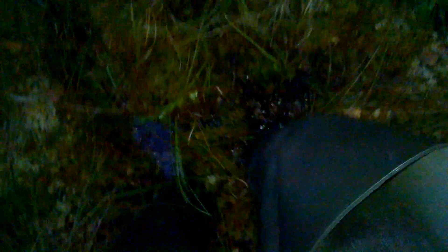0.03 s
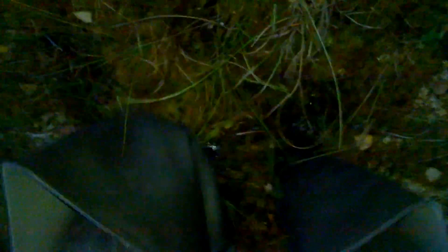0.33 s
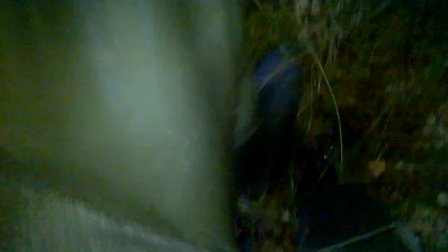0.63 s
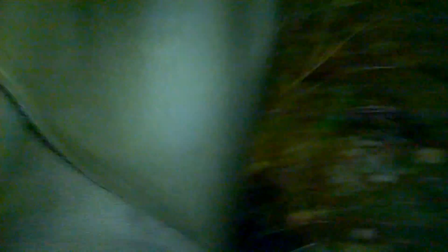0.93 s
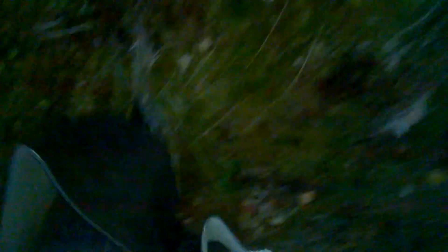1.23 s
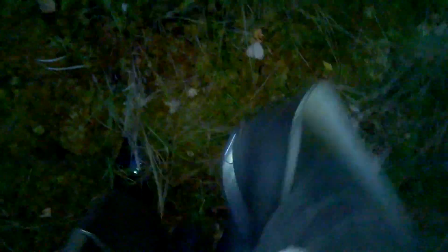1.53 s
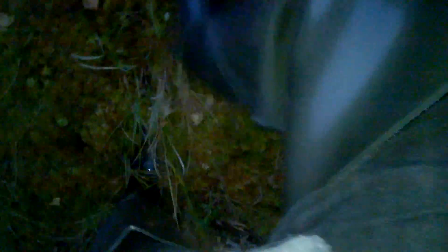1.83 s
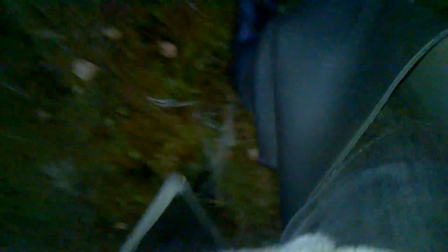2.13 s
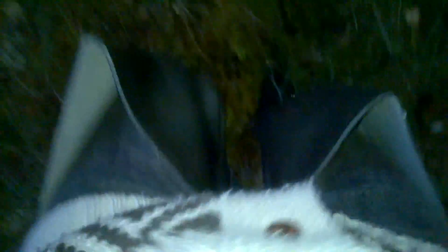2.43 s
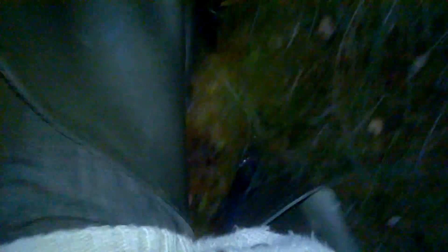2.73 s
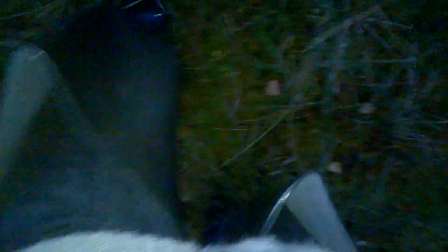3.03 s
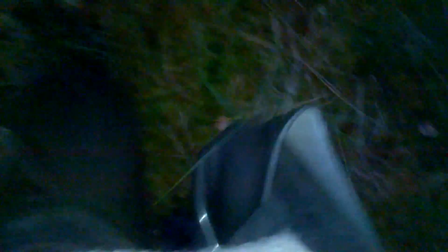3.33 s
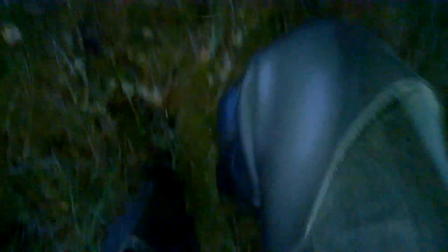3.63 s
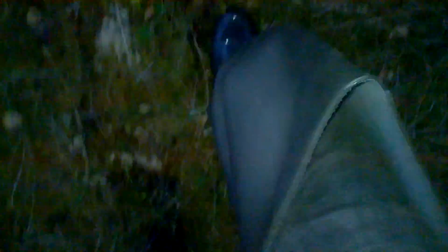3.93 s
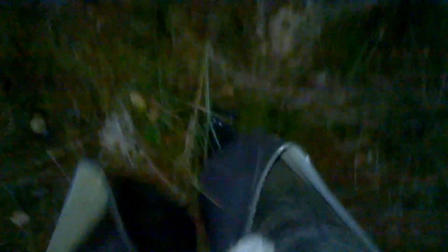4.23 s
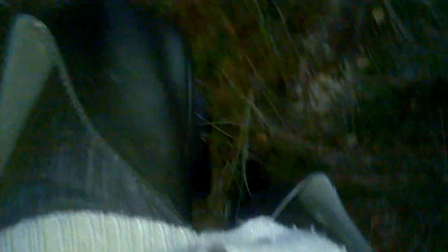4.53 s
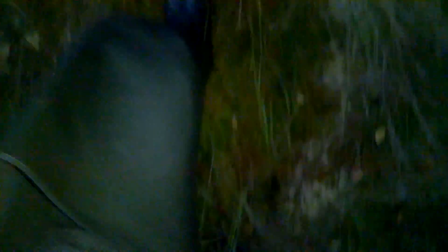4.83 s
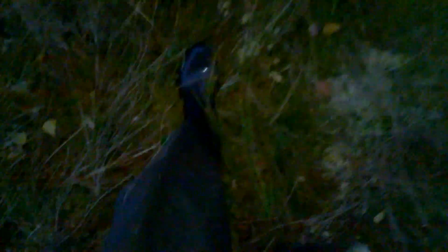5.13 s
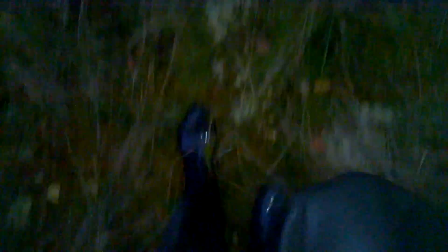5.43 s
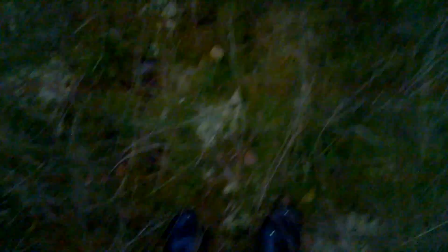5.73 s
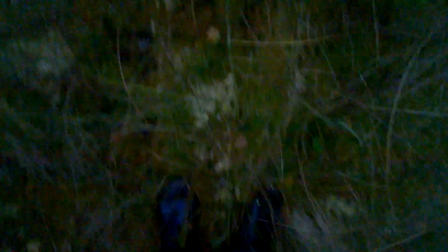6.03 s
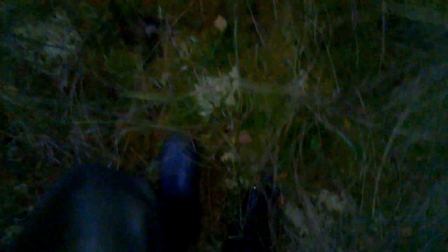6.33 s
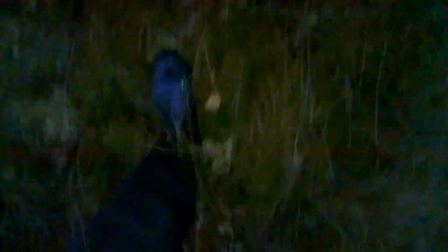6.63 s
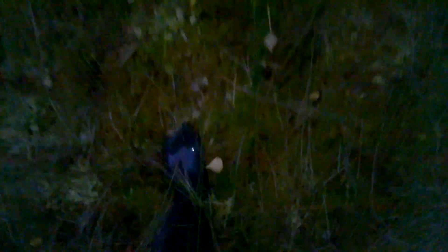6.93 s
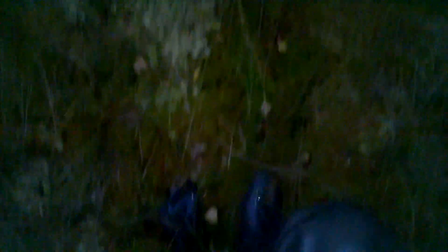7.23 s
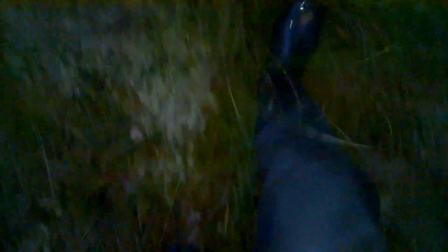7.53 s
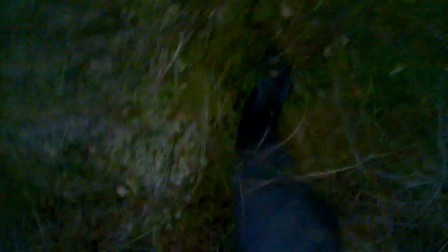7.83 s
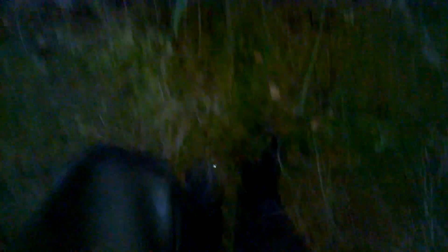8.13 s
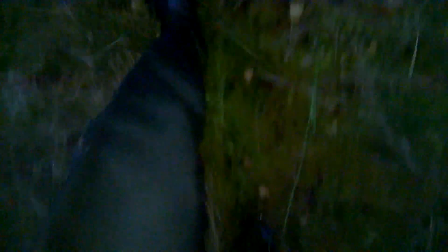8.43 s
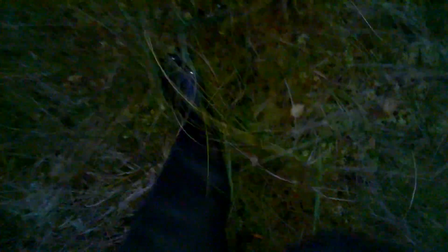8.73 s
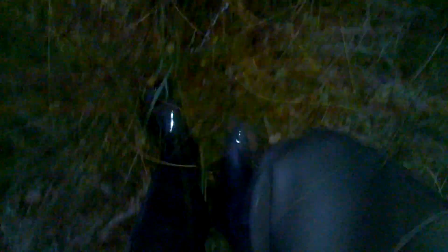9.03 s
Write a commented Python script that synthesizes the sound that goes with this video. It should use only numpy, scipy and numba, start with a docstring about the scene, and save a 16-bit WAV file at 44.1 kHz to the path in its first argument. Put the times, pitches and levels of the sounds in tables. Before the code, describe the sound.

Close footsteps in rubber waders on soaked moss and grass, with hollow rubber knocks and a low rumble of air.

```python
"""On wet moss and grass, someone walks in rubber waders, heard from about hip height.
On each stride a boot lifts through the grass, the legs rub past each other and a boot shaft (the
tube around the leg) folds with a falling, hollow scuff. Loose rubber knocks close to the microphone.
Underfoot, soaked moss fizzes, stalks crackle and the soft ground thuds.
Air rumbles on the carried microphone, over a faint outdoor hush."""
import sys
import numpy as np
from scipy import signal
from scipy.fft import rfft, irfft, next_fast_len
from scipy.io import wavfile
from numba import njit

SR = 44100
rng = np.random.default_rng(int(sys.argv[2]) if len(sys.argv) > 2 else 0)


def inscribe(sig):
    """Save sig as 16-bit PCM at rate SR to the path in sys.argv[1].

    A 1-D sig is mono; a 2-D sig holds one channel per row.
    Samples are clipped to [-1, 1] before scaling.
    """
    pcm = np.round(np.clip(np.atleast_2d(sig).T, -1, 1) * 32767)
    wavfile.write(sys.argv[1], SR, pcm.astype(np.int16))


N = 401310

# one leg swings past the other, at full speed from time t:
# t/s, rise/s, hold/s, fall/s, rubbing/dB, squelch/dB, stalks/dB, hiss/dB
LEG_SWINGS = [(0.94, 0.04, 0.11, 0.15, -42, -46.5, -46.5, -57.5),
              (1.835, 0.027, 0.1, 0.26, -46.5, -50, -51.5, -66),
              (2.89, 0.13, 0.12, 0.18, -46, -45.5, -55, -66),
              (3.97, 0.077, 0.065, 0.091, -43.5, -42.5, -46.5, -60.5),
              (4.841, 0.028, 0.13, 0.13, -44, -45.5, -47, -56),
              (5.509, 0.025, 0.085, 0.19, -46, -44, -49.5, -59),
              (6.609, 0.075, 0.17, 0.15, -44, -50.5, -56, -64),
              (7.505, 0.036, 0.11, 0.18, -43.5, -47.5, -47, -56),
              (8.432, 0.12, 0.15, 0.04, -41.5, -47, -46, -59)]
# between strides the legs never quite rest: t/s, rubbing/dB, squelch/dB, stalks/dB
RESTING_LEVELS = [(0, -69, -62.5, -65.5), (1.4, -75, -58.5, -64), (5, -63.5, -61.5, -63),
                  (9.1, -55, -72.5, -80)]
# a boot shaft folds: t/s, rise/s, fall/s, level/dB, starting f/Hz, rasp against that level/dB
SHAFT_FOLDS = [(.11, 0.038, 0.078, -57.5, 420, -3), (0.303, .01, 0.035, -31, 1340, 1),
               (0.333, 0.017, 0.048, -41, 390, 2.5), (.364, 0.0043, 0.016, -41.5, 1150, 1),
               (0.504, 0.017, 0.0083, -52.5, 1070, 8), (0.908, .005, .03, -44, 1700, 0),
               (.963, 0.019, 0.014, -32.5, 1300, -8.5), (1.271, 0.018, .017, -35, 795, -3.5),
               (1.299, 0.019, 0.033, -35, 805, -14.5), (2.041, 0.053, 0.031, -38.5, 1360, -20),
               (2.087, 0.015, 0.073, -38, 740, -20), (2.28, 0.027, 0.043, -52, 476, -10),
               (2.98, 0.02, 0.02, -51, 1360, 4), (2.995, 0.0057, 0.088, -44.5, 645, -20),
               (3.198, 0.043, 0.023, -40, 1490, -20), (4.006, 0.056, 0.02, -39, 1420, -12),
               (4.042, .025, 0.014, -33.5, 850, -24), (4.08, 0.039, 0.02, -45, 800, -5),
               (4.46, 0.043, 0.07, -54, 1450, -23), (4.872, 0.023, 0.027, -41, 1290, -15),
               (4.939, 0.023, 0.041, -42.5, 654, -23), (5.491, 0.0053, 0.027, -47, 1310, 8),
               (6.048, 0.0027, 0.0092, -38, 1420, 5), (6.06, 0.035, 0.0096, -30.5, 1450, 4),
               (6.096, 0.016, 0.031, -39, 1230, 3), (6.72, 0.06, 0.041, -51.5, 1500, 7.5),
               (7.49, 0.023, .02, -48.5, 1500, 8.5), (8.479, .012, 0.011, -38.5, 1400, 4),
               (8.5, 0.088, 0.024, -37.5, 1100, -12), (8.586, 0.0048, 0.012, -30.5, 1240, -3.5)]
# loose rubber knocks: t/s, ring level/dB, ring f/Hz, crack level/dB, thump level/dB
RUBBER_KNOCKS = [(0.415, -30.5, 590, -65, -23.5), (.724, -36, 700, -55, -28), (0.999, -26, 776, -60, -21),
                 (1.321, -25, 645, -64, -21), (2.709, -54, 600, -86, -30), (3.1658, -21, 1120, -35, -38),
                 (3.2032, -24, 1300, -30.5, -50), (3.2134, -4.5, 1140, -20.5, -23),
                 (3.797, -21.5, 1110, -60, -22), (3.9449, -23, 1240, -25.5, -55),
                 (4.4517, -11.5, 1200, -51, -50), (5.581, -16, 1210, -28, -26),
                 (5.5925, -8.5, 1000, -22, -12.5), (5.597, -8.5, 870, -36, -10),
                 (5.6108, -1, 1130, -17.5, -9.5), (5.7278, -17, 1080, -59, -29),
                 (5.941, -18, 1010, -37, -28), (5.954, -20, 930, -36, -47), (5.9602, -11.5, 1010, -24, -39),
                 (5.9616, -1.5, 935, -28, -15.5), (6.311, -25, 1060, -51, -16.5),
                 (6.827, -26, 910, -63, -25), (6.9036, -0.5, 997, -19.5, -9),
                 (7.208, -27, 1170, -33.5, -41), (7.2104, -10.5, 1010, -33, -16),
                 (7.9805, -23.5, 1060, -35, -19), (7.9865, -30, 980, -34, -57), (8.5691, -3, 770, -13, -7),
                 (8.5738, -9.5, 1160, -16.5, -24)]
# tones of a knocked shaft: multiple of the ring pitch, level/dB, t60/s (time to fade by 60 dB)
SHAFT_TONES = [(.76, -18.5, 0.014), (1.0, 2.5, 0.0062), (1.38, 4, 0.00091), (2.0, -9, 0.0072),
               (3.6, -26, 0.001)]
# tones in the crack of a rubber edge letting go: f/Hz, level/dB, t60/s
CRACK_TONES = [(1860, -1, 0.0042), (3800, 4, 0.0023), (11030, 4, 0.0017), (14600, -6, 0.0031)]
# a boot lifts or shifts in the grass: t/s, length/s, hiss/dB, low f/Hz, high f/Hz, stalks/dB, squelch/dB
GRASS_BRUSHES = [(0.401, 0.25, -57, 5000, 13300, -52.5, -54), (0.588, 0.33, -54, 10000, 16000, -51, -61),
                 (1.595, 0.3, -59.5, 8800, 16300, -57.5, -62), (2.217, 0.27, -82, 6000, 12000, -57, -55.5),
                 (2.556, 0.39, -58, 8100, 14300, -52.5, -62), (3.077, .28, -67, 9050, 16000, -71, -49),
                 (3.65, 0.15, -59, 8000, 15300, -56.5, -76), (4.12, 0.32, -77, 6000, 12000, -55.5, -52),
                 (4.431, 0.1, -57.5, 5000, 14000, -53.5, -70), (4.544, 0.29, -59, 8500, 13600, -55.5, -71),
                 (5.173, 0.3, -61.5, 6060, 13000, -56, -59), (5.423, 0.14, -52.5, 5800, 15000, -48.5, -71),
                 (6.169, 0.049, -55.5, 5300, 11300, -65, -58), (6.318, 0.29, -54.5, 5100, 14300, -62, -68),
                 (6.954, 0.43, -62, 5840, 10400, -79, -74), (7.289, 0.21, -55.5, 6250, 14100, -56, -63),
                 (8.049, 0.2, -50.5, 5000, 15000, -60, -56.5), (8.227, 0.26, -50.5, 5460, 13200, -63, -75),
                 (8.61, 0.41, -63, 5800, 9700, -67.5, -67), (8.926, 0.22, -55.5, 5840, 12600, -62, -83)]
# the loudest stalks snapping and bubbles bursting: t/s, level/dB, f/Hz
LOUD_SNAPS = [(0.039, -43, 3000), (.428, -37, 1600), (0.527, -30.5, 3070), (0.95, -22, 2580),
              (1.279, -25.5, 2930), (1.913, -29, 2130), (1.951, -30, 2370), (2.626, -31, 3480),
              (2.995, -24.5, 2800), (3.001, -25, 3150), (4.841, -32, 2630), (4.877, -35, 1290),
              (5.183, -36.5, 3070), (5.493, -48, 2400), (6.759, -31.5, 5630), (7.455, -36.5, 2180),
              (7.524, -28, 4100)]
# boots sink into the moss: t/s, level/dB, f/Hz
GROUND_THUDS = [(0.725, -40, 91), (2.165, -34.5, 81), (3.222, -25, 45), (5.615, -49, 45),
                (5.735, -23.5, 65), (6.098, -27, 85), (6.967, -30, 59), (8.637, -29, 109),
                (8.791, -27.5, 42)]
# slow rise and fall of the air rumble, before boost and gusts: t/s, level/dB
RUMBLE_LEVELS = [(0.0, -53), (0.68, -53.5), (0.73, -42.5), (1.52, -51), (3.27, -43), (3.47, -53.5),
                 (5.04, -51.5), (5.45, -52), (5.75, -43), (5.78, -50.5), (6.72, -54.5), (6.77, -46),
                 (8.46, -47), (8.56, -37), (8.77, -55), (8.79, -43.5), (9.1, -58)]

# A colour says how strong the low and high parts of a sound are next to each other.
# rubber sliding on rubber: f/Hz, level/dB
RUB_COLOUR = [(100, 2), (230, 5.5), (340, 3), (500, 5), (850, 5.5), (1250, 2.5), (1800, 4), (2600, 8),
              (5000, -39.5)]
# the rasp of a folding shaft: f/Hz, level/dB
RASP_COLOUR = [(150, -7.5), (550, -15.5), (1300, -11), (1650, -11.5), (2150, -2), (3000, -6), (4200, -19),
               (7000, -22.5), (15000, -37)]
# water fizzing out of moss: f/Hz, level/dB
FIZZ_COLOUR = [(1000, -17), (1700, 2.5), (2250, 7.5), (3100, 9), (3900, -3.5), (5500, -72)]
# grass flicking along the boots: f/Hz, level/dB
STALK_COLOUR = [(2800, 3.5), (3900, 5), (5200, 3.5), (6000, -2.5), (7000, -7), (12000, -34)]
# air pushing on the microphone: f/Hz, level/dB
RUMBLE_COLOUR = [(20, -2.5), (34, 4.5), (50, -20), (100, -21.5), (180, -26), (400, -30), (900, -100)]
# the outdoor hush: f/Hz, level/dB
HUSH_COLOUR = [(35, -26), (60, 5), (448, -9), (803, -6), (1510, -24), (2300, -14.5), (3190, -53),
               (4120, -29.5), (5860, -21.5), (7750, -28), (12100, -29.5), (14900, -34), (16000, -39)]


def rubbing(rub_db, judder_db=3.5, hollow_db=-6, hollow_hz=1150, wander_octaves=0.31, damping=0.24):
    """Rubber slides on rubber in tiny slips, gripping unevenly; its creases ring at a wandering pitch."""
    sliding = coloured(slips(4000, spread_db=2.0), RUB_COLOUR)
    crease_hz = hollow_hz * 2 ** (wander_octaves * drift(30))
    creases = rms_one(gliding_resonance(sliding, crease_hz, damping, SR))
    return from_db(rub_db + judder_db * drift(70)) * rms_one(sliding + from_db(hollow_db) * creases)


def scuffs(damping=0.75, judder_db=3.5, body_db=-12.5, dull_hz=3500, end_pitch_ratio=0.6):
    """A folding shaft rasps, and its hollow note sinks as the fold opens."""
    out = np.zeros(N)
    friction = butter(slips(2500, spread_db=-3.0), dull_hz, "low")
    rasp = coloured(slips(3500, spread_db=2.5), RASP_COLOUR)
    grip = from_db(judder_db * drift(200))
    body = from_db(body_db) * rms_one(butter(slips(2500, spread_db=1.5), [170, 400], "band"))
    for s, rise, fall, db, first_hz, rasp_db in SHAFT_FOLDS:
        t = np.arange(int((rise + 2 * fall) * SR)) / SR
        part = slice(int(s * SR), int(s * SR) + len(t))
        pressure = np.where(t < rise, (t / rise) ** 0.36, np.exp(-1.5 * ((t - rise) / fall) ** 2))
        hz = np.interp(t, [0, rise + fall], [first_hz, end_pitch_ratio * first_hz])
        hollow = gliding_resonance(friction[part], hz, damping, SR)
        hollow = rms_one(gliding_resonance(hollow, hz, damping, SR))   # twice, for a clearer note
        # wide, low folds shake the whole shaft
        shake = body[part] * np.minimum(800 / hz, 1) ** 2
        add(out, s, from_db(db) * pressure * (hollow + from_db(rasp_db) * rasp[part] + shake))
    return out * grip


def knocks(thump_hz=120, thump_t60=0.01, tail_db=-38, tail_s=0.019, rebound_db=-15, rebound_s=0.002376):
    """Loose rubber snaps over: a very short crack, a dull ring, a weak rebound and a low thump."""
    out, t = np.zeros(N), np.arange(SR // 6) / SR
    click = signal.unit_impulse(len(t))
    thump = butter(ring(click, thump_hz, thump_t60), 430, "low")
    for s, db, hz, crack_db, thump_db in RUBBER_KNOCKS:
        # neighbouring tones swing opposite ways, so the ring swells over its first cycle
        shaft = sum((-1) ** k * from_db(tone_db) * ring(click, ratio * hz, t60)
                    for k, (ratio, tone_db, t60) in enumerate(SHAFT_TONES))
        # each snap frees a slightly different length of edge
        crack = sum((-1) ** k * from_db(tone_db) * ring(click, tone_hz * rng.uniform(.92, 1.08), t60)
                    for k, (tone_hz, tone_db, t60) in enumerate(CRACK_TONES))
        shiver = rms_one(butter(rng.standard_normal(len(t)), [700, 1700], "band"))
        # a small patch of rubber gives off little sound below its ring
        body = butter(shaft, hz / 2, "high") + from_db(tail_db) * shiver * np.exp(-t / tail_s)
        add(out, s, from_db(crack_db) * crack + from_db(db) * body - from_db(thump_db) * thump)
        add(out, s + rebound_s * rng.uniform(.8, 1.2), from_db(db + rebound_db) * body)
    return out


def brushes(swing_db, tick_db=-4, flutter_db=4.0, swing_band_hz=(7500, 13500)):
    """Fibres hiss and single blades catch whenever a leg swings or a boot brushes the grass."""
    blades = from_db(tick_db) * slips(450, spread_db=5.0)
    fibres = (rng.standard_normal(N) + blades) * from_db(flutter_db * drift(45))
    out = from_db(swing_db) * rms_one(butter(fibres, swing_band_hz, "band"))
    for s, length, db, low_hz, high_hz, *_ in GRASS_BRUSHES:
        stroke = fibres[int(s * SR):][:int(length * SR)]
        for _ in range(2):
            stroke = butter(stroke, [low_hz, high_hz], "band")
        add(out, s, from_db(db) * swell(length)[:len(stroke)] * rms_one(stroke))
    return out


def squelch(squelch_db, flutter_db=3.0, pop_db=-11):
    """Water fizzes out of the squeezed moss and small bubbles burst in it."""
    fizz = coloured(slips(9000, spread_db=5.5), FIZZ_COLOUR) * from_db(flutter_db * drift(60))
    pitches_hz = np.geomspace(2000, 4400, num=16)
    bursts = slips(220, spread_db=6.5)
    pitch_choice = rng.integers(0, len(pitches_hz), N)
    pops = rms_one(sum(ring(bursts * (pitch_choice == k), hz, 30 / hz) for k, hz in enumerate(pitches_hz)))
    return from_db(squelch_db) * (fizz + from_db(pop_db) * pops)


def stalks(swish_db, flutter_db=3.0):
    """Grass blades flick along the boots in little clumps."""
    return from_db(swish_db + flutter_db * drift(50)) * coloured(slips(5000, spread_db=3.5), STALK_COLOUR)


def crackle(squelch_db, per_s=55, relative_db=-11, band_hz=(1400, 3400)):
    """Small stems give way now and then under the weight."""
    breaks = butter(slips(per_s, spread_db=2.0), band_hz, "band")
    return from_db(squelch_db + relative_db) * rms_one(breaks)


def snaps(cycles=24, splinter_db=-3, splinter_s=0.0025):
    """A stalk snaps or a bubble bursts: a splinter of noise and a short, pitched tick."""
    out, t = np.zeros(N), np.arange(SR // 20) / SR
    for s, db, hz in LOUD_SNAPS:
        noise = rms_one(butter(rng.standard_normal(len(t)), [hz / 2, hz * 1.19], "band"))
        splinter = noise * np.exp(-t / splinter_s)
        tick = ring(signal.unit_impulse(len(t)), hz, cycles / hz)
        add(out, s, from_db(db) * (tick + from_db(splinter_db) * splinter))
    return out


def thuds(t60=0.055):
    """The soft ground takes the weight with a short, deep swing."""
    out, click = np.zeros(N), signal.unit_impulse(SR // 4)
    for s, db, hz in GROUND_THUDS:
        add(out, s, from_db(db) * ring(click, hz, t60))
    return butter(out, 260, "low")


def air_rumble(boost_db=0.3, gust_db=2.0):
    """Air pushes on the carried microphone in uneven, deep gusts."""
    slow_db, = in_time(RUMBLE_LEVELS)
    gain = from_db(slow_db + boost_db + gust_db * drift(14))
    return gain * coloured(rng.standard_normal(N), RUMBLE_COLOUR)


def outdoor_hush(hush_db=-55, hiss_db=-70):
    """A faint, steady hush with an even fainter hiss."""
    hush = from_db(hush_db) * coloured(rng.standard_normal(N), HUSH_COLOUR)
    return hush + from_db(hiss_db) * rng.standard_normal(N)


def walk_levels(seep_db=-14, seep_fall_s=0.36):
    """Strides and brushes add up to four changing levels in dB: rubber, moss, stalks and hiss."""
    rub, moss, grass = from_db(in_time(RESTING_LEVELS)) ** 2   # squared, because noises add by power
    hiss = np.zeros(N)
    for s, rise, hold, fall, rub_db, squelch_db, stalks_db, hiss_db in LEG_SWINGS:
        leg = stride_speed(s, rise, hold, fall)
        # after each stride the pressed moss goes on seeping
        ground = np.maximum(leg, from_db(seep_db) * stride_speed(s, rise, hold, seep_fall_s))
        rub += (from_db(rub_db) * leg) ** 2
        moss += (from_db(squelch_db) * ground) ** 2
        grass += (from_db(stalks_db) * leg) ** 2
        hiss += (from_db(hiss_db) * leg) ** 2
    for s, length, *_, stalks_db, squelch_db in GRASS_BRUSHES:
        add(grass, s, (from_db(stalks_db) * swell(length)) ** 2)
        add(moss, s, (from_db(squelch_db) * swell(length)) ** 2)
    return 10 * np.log10([rub, moss, grass, hiss])


def stride_speed(s, rise, hold, fall):
    """The leg speeds up, swings through and slows down; 1 at full speed."""
    t = np.arange(N) / SR - s
    return np.exp(np.maximum(np.minimum(t / rise, 0) - np.maximum(t - hold, 0) / fall, -30))


def swell(length):
    """A brush grows a little faster than it fades."""
    return np.sin(np.pi * np.linspace(0, 1, int(length * SR), endpoint=False) ** .8) ** 1.2


def slips(per_s, spread_db):
    """Tiny clicks of uneven size at random times, as things catch and let go."""
    sizes = from_db(spread_db * np.minimum(rng.exponential(1, N), 4)) * rng.choice([-1, 1], N)
    return rms_one(sizes * (rng.random(N) < per_s / SR))


def drift(per_s):
    """A wandering value, about 1 in size, that heads somewhere new per_s times a second."""
    targets = rng.standard_normal(8000)
    return np.interp(np.arange(N) / SR * per_s, np.arange(len(targets)), targets)


def ring(clicks, hz, t60):
    """Each click starts a pure tone that fades by 60 dB in t60 seconds."""
    decay, angle = from_db(-60 / (t60 * SR)), 2 * np.pi * hz / SR
    return signal.lfilter([0, np.sin(angle)], [1, -2 * decay * np.cos(angle), decay ** 2], clicks + 1e-18)


@njit
def gliding_resonance(x, hz, damping, sr):
    """Bring out the sound near a moving pitch; less damping rings longer."""
    out, low, band = np.zeros(len(x)), 0., 0.
    for i in range(len(x)):
        step = 2 * np.sin(np.pi * hz[i] / sr)
        low += step * band
        band += step * (x[i] - low - damping * band)
        out[i] = band
    return out


def coloured(x, colour):
    """Shape a noise with a colour table, then scale it to power 1."""
    hz, db = np.transpose(colour)
    size = next_fast_len(N)
    f = np.maximum(np.fft.rfftfreq(size, 1 / SR), 1)
    edge_fade = 1 / np.sqrt((1 + (hz[0] / f / 2) ** 4) * (1 + (f / hz[-1] / 2) ** 4))
    gain = from_db(np.interp(np.log(f), np.log(hz), db)) * edge_fade
    return rms_one(irfft(rfft(x, size) * gain, size)[:N])


def butter(x, hz, kind):
    """A gentle filter that keeps the lows, the highs or a band between."""
    sections = signal.butter(2, np.clip(hz, 10, .45 * SR), kind, fs=SR, output="sos")
    return signal.sosfilt(sections, x + 1e-18)


def from_db(db):
    """Turn decibels into a number to multiply by."""
    return 10 ** (np.asarray(db) / 20)


def rms_one(x):
    """Scale a sound to an average power of 1."""
    return x / np.sqrt(np.mean(x ** 2) + 1e-20)


def in_time(rows):
    """Join a table's timed points with straight lines, one curve for each level column."""
    s, *columns = np.transpose(rows)
    return [np.interp(np.arange(N) / SR, s, column) for column in columns]


def add(out, s, sound):
    """Mix a sound in, starting at s seconds."""
    i = max(int(s * SR), 0)
    out[i:i + len(sound)] += sound[:N - i]


def scene():
    """Waders and ground are close and free of echo, over the air's rumble and hush."""
    rub_db, squelch_db, swish_db, swing_db = walk_levels()
    waders = rubbing(rub_db) + scuffs() + knocks() + brushes(swing_db)
    underfoot = squelch(squelch_db) + stalks(swish_db) + crackle(squelch_db) + snaps() + thuds()
    return (waders + underfoot + air_rumble() + outdoor_hush())[None]


def record(dry):
    """The highest treble, above 15800 Hz, is cut steeply."""
    return signal.sosfilt(signal.ellip(10, .2, 80, 15800, fs=SR, output="sos"), dry)


dry = scene()
out = record(dry)
inscribe(out)
```